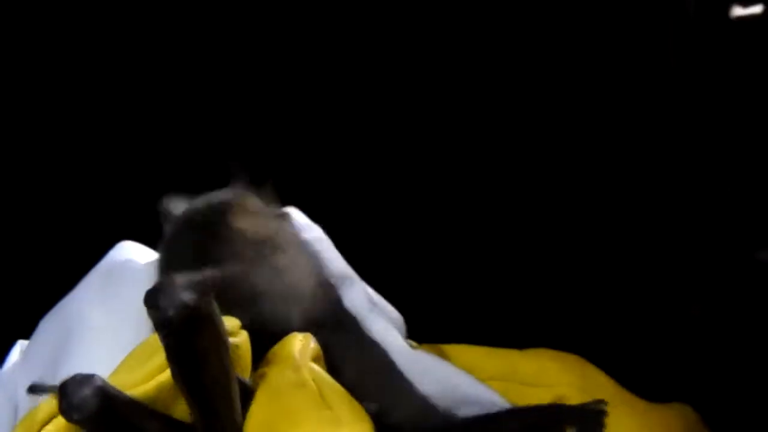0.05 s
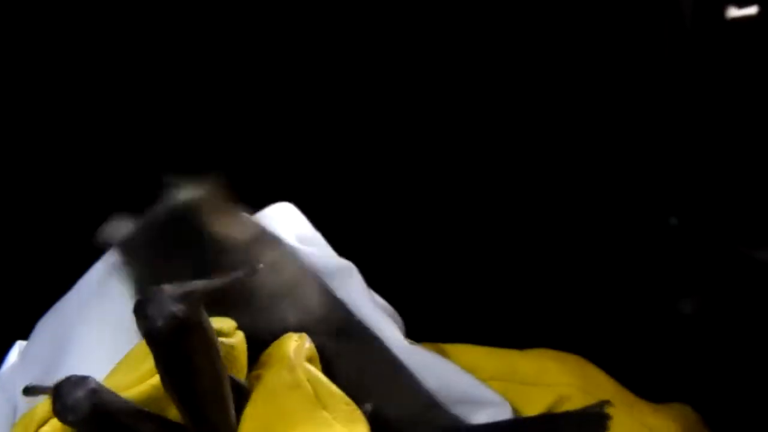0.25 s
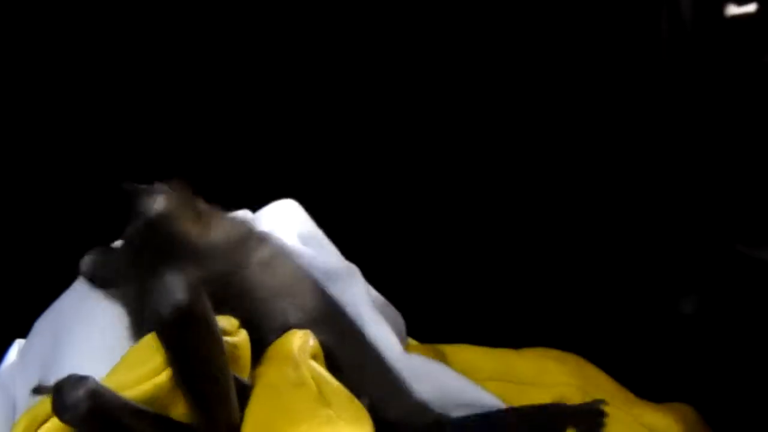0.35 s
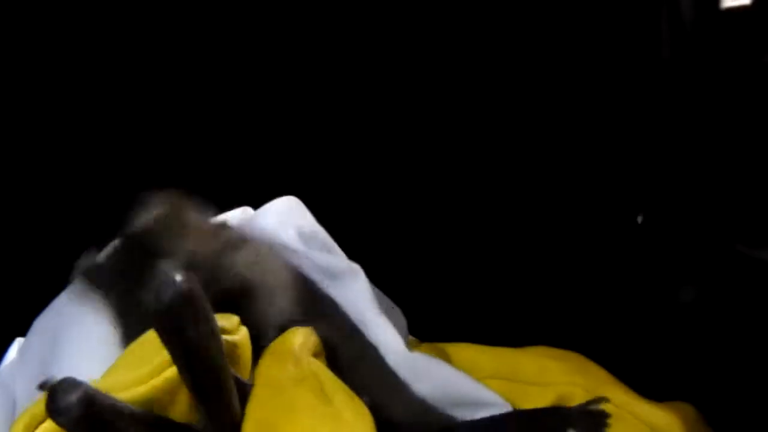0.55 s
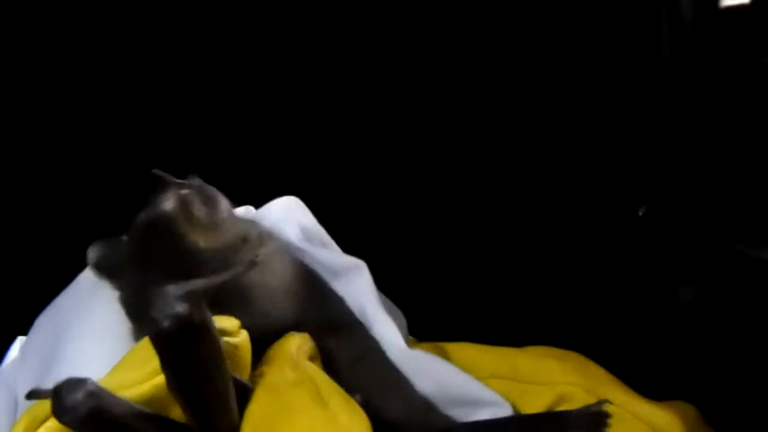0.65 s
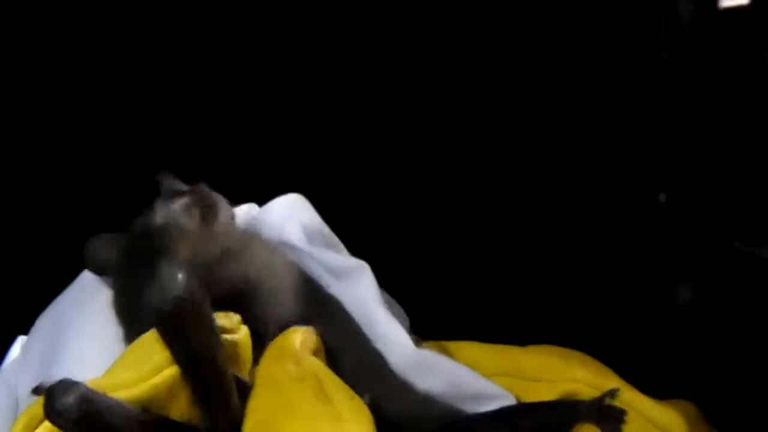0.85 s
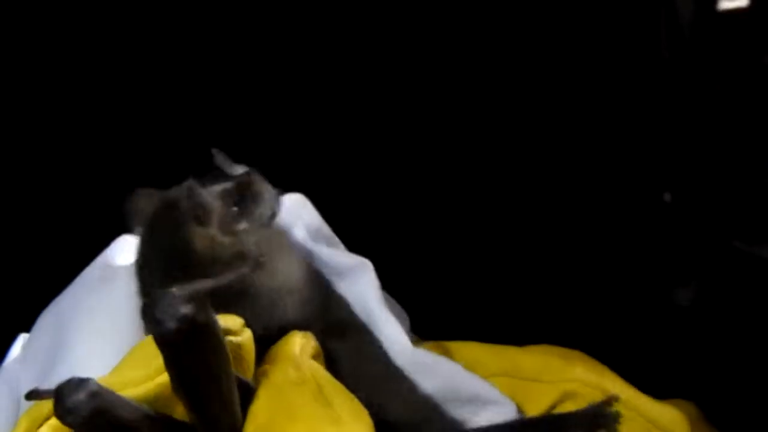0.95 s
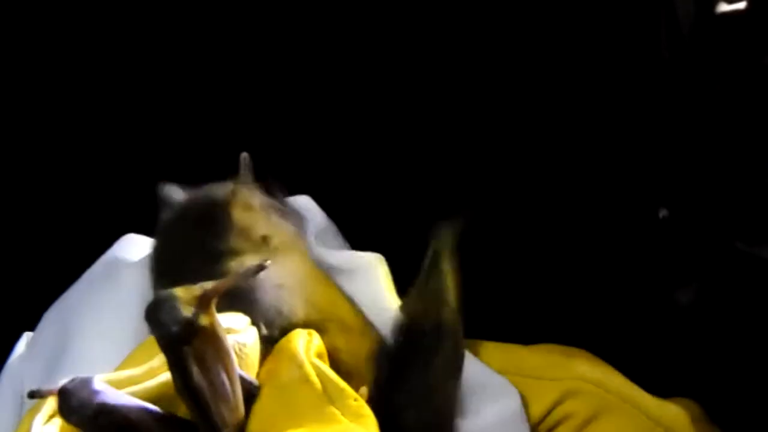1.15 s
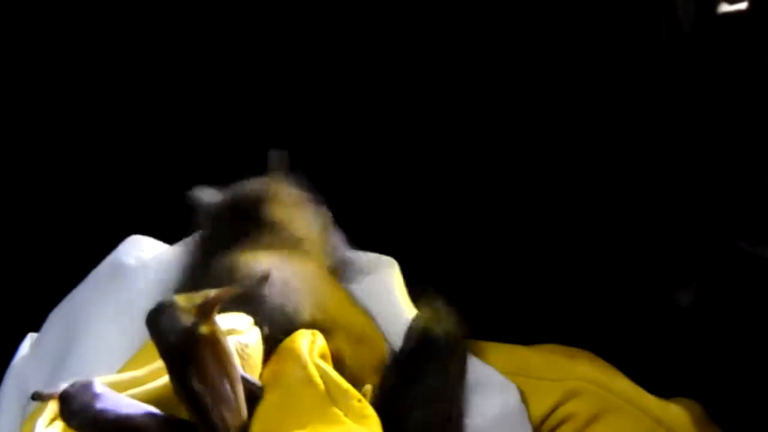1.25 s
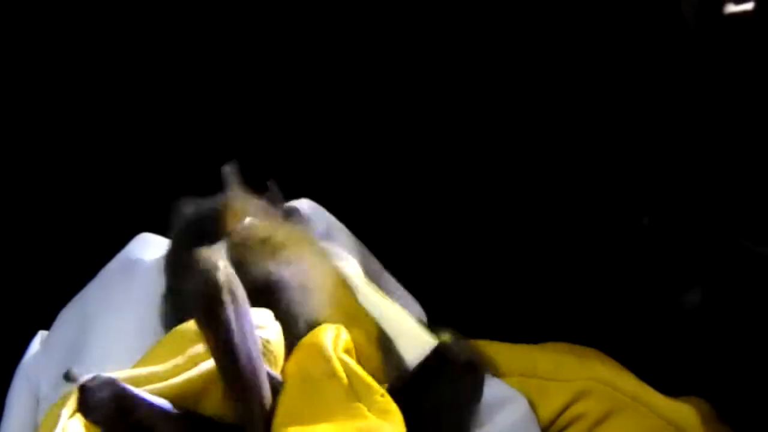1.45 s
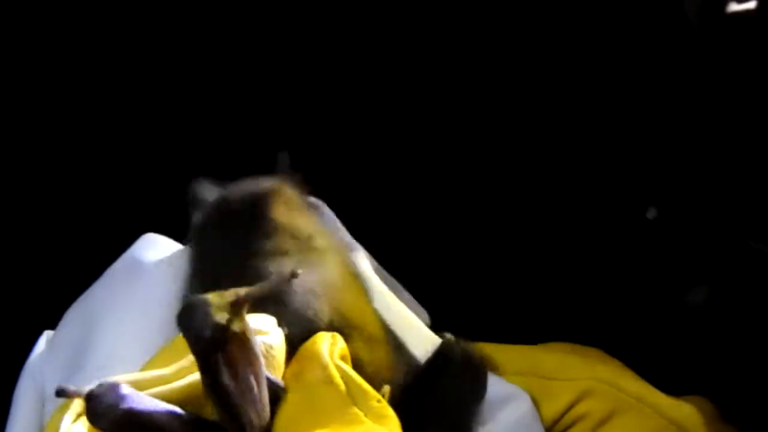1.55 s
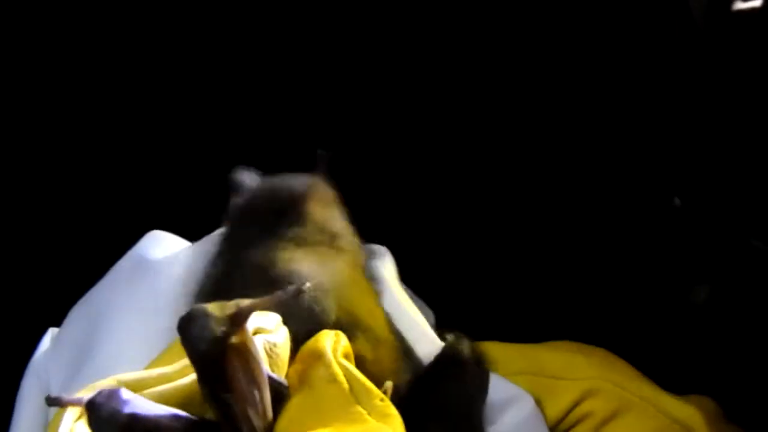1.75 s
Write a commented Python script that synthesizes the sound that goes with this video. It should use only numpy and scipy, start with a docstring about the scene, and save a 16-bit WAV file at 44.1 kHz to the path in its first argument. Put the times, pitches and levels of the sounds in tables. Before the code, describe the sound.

A bat held in a gloved hand squeaks close to the microphone, about seven short, high calls a second without a break. A faint echo, quiet hiss and low hum lie behind it, outdoors at night.

```python
"""Squeaks of a hand-held bat

A bat held in a gloved hand outdoors at night squeaks about seven times a second. As in the source-filter
model, each squeak is a harmonic series shaped by the throat. Its pitch dips, climbs to a crest and drops
as the voice closes; the overtones swell with effort and sweep through a mouth resonance.
A faint diffuse echo, a quiet night hiss and a low hum lie behind."""
import sys
import numpy as np
from scipy import signal
from scipy.fft import rfft, irfft
from scipy.io import wavfile
from scipy.ndimage import uniform_filter1d, minimum_filter1d

SR = 44100
rng = np.random.default_rng(int(sys.argv[2]) if len(sys.argv) > 2 else 0)


def master_out(mix):
    """Clip the mix to full scale and print it as 16-bit PCM to the path in sys.argv[1]."""
    frames = np.transpose(np.atleast_2d(mix))
    ceiling = np.clip(frames, -1, 1)
    pcm = np.round(ceiling * 32767).astype(np.int16)
    wavfile.write(sys.argv[1], SR, pcm)


N = 79380
T = np.arange(N) / SR

# Spectral density of the night background: f/Hz, relative level/dB
NIGHT_SPECTRUM = [(25, 2), (900, -9.5), (3400, -4), (10000, -9), (14500, -18.5)]
# Slow course of the night background: t/s, level/dB
NIGHT_ENVELOPE = [(.1, -50), (.7, -54), (1.5, -49.5)]
# Frequency response of the scattering surroundings: f/Hz, gain/dB
ECHO_RESPONSE = [(1500, -25), (6800, -24.5), (9000, -18)]
# Frequency response of the throat: f/Hz, gain/dB
THROAT_RESPONSE = [(1150, -8.5), (1400, -3), (1850, 3), (2350, -3), (3080, 3), (3600, 1), (3900, -15.5),
                   (5300, -7.5), (6100, -9.5), (7150, 2), (7750, -2.5), (11000, -19), (14500, -33)]
# Spells in which the voice breaks into strong and weak cycles: centre t/s, half length/s, depth (0-1)
PERIOD_DOUBLINGS = [(0.32, 0.013, 0.2), (0.377, 0.015, 0.01), (1.12, 0.014, 0.27), (1.645, 0.01, 0.03),
                    (1, 0.005, 0.16)]
# One squeak a row; later times count from its start, and levels are relative:
# start t/s, length/s, first turn t/s, second turn t/s, crest t/s,
# onset f/Hz, first turn f/Hz, second turn f/Hz, crest f/Hz, onset level/dB, crest level/dB,
# resting overtone level/dB, swollen overtone level/dB, swell centre t/s, swell half width/s,
# second harmonic gain/dB, mouth resonance f/Hz, mouth resonance gain/dB, antiresonance f/Hz
SQUEAK_GESTURES = [(-0.02, 0.034, 0.0055, 0.019, 0.022, 1236, 1252, 1247, 1347, -37, -33, -3, -1, 0.04, 0.016, 5.5, 7800, 8, 2806),
                   (0.0506, 0.087, 0.013, 0.043, 0.07, 1481, 1671, 1244, 1455, -31.5, -31.5, -4, 1, 0.072, 0.0091, 6, 7500, 4, 2917),
                   (0.1782, 0.091, 0.017, 0.061, 0.072, 1594, 1133, 1448, 1555, -34, -29.5, -15, 13.5, 0.066, 0.042, -0.5, 8770, 14.5, 2903),
                   (0.315, 0.086, 0.012, 0.027, 0.071, 1547, 1179, 1174, 1771, -37, -26.5, -11.5, 12, 0.063, 0.032, 1.5, 6860, 13.5, 2710),
                   (0.4454, 0.094, 0.0096, 0.038, 0.073, 1568, 1166, 1178, 1562, -39, -34.5, -18, 9, 0.074, 0.026, 1.5, 6240, 12, 2744),
                   (0.586, 0.089, 0.011, 0.049, 0.073, 1548, 1244, 1459, 1441, -37, -32.5, -15.5, -4, 0.041, 0.017, 7, 6200, 18.5, 2677),
                   (0.73, 0.084, 0.026, 0.037, 0.064, 1438, 1368, 1197, 1538, -42.5, -34, -35, 6.5, 0.063, 0.041, 4, 8430, 6, 2720),
                   (0.867, 0.086, 0.01, 0.059, 0.069, 1580, 1237, 1726, 1761, -35.5, -28, -6, 4, 0.077, 0.0084, 0, 5120, 8.5, 2840),
                   (1.0015, 0.092, 0.013, 0.035, 0.073, 1597, 1139, 1158, 1523, -37, -32, -9, 11.5, 0.069, 0.026, 2, 6680, 7, 2726),
                   (1.154, 0.069, 0.015, 0.032, 0.057, 1442, 1411, 1224, 1535, -38.5, -30, -17.5, -8, 0.06, 0.025, 6.5, 5540, 16, 2845),
                   (1.268, 0.066, 0.0166, 0.031, 0.052, 1386, 1393, 1345, 1570, -31.5, -31, -19.5, 5, 0.05, 0.025, 2, 7320, 9.5, 2880),
                   (1.367, 0.075, 0.0085, 0.053, 0.062, 1517, 1273, 1546, 1537, -35, -30.5, -18, 3.5, 0.053, 0.042, 6, 7930, 13.5, 2976),
                   (1.4745, 0.078, 0.0042, 0.021, 0.046, 1516, 1405, 1785, 1902, -33, -26, -7.5, 1.5, 0.019, 0.013, 2.5, 5620, 13, 2770),
                   (1.5996, 0.062, 0.012, 0.03, 0.047, 1480, 1415, 1187, 1402, -36.5, -29.5, -20.5, 2.5, 0.041, 0.026, -2, 9860, 10.5, 3140),
                   (1.714, 0.072, 0.0068, 0.029, 0.055, 1424, 1322, 1235, 1507, -38, -28, -13.5, -1.5, 0.05, 0.032, 0.5, 8520, 13.5, 2912)]

ECHO_T60_S, ECHO_BUILD_S = 0.14, 0.019
HUM_HZ, HUM_BANDWIDTH_HZ, HUM_DB = (415, 612), 55, -68.5
VOICE_DB, OVERTONE_DB = 1.37, -3  # offsets to the tabulated levels
ATTACK_S, RELEASE_S = 0.0006, 0.0045
CLOSING_HZ, CLOSING_CURVE = 991, 3.44  # final pitch; a higher power delays the drop
JITTER, JITTER_HZ = 0.0061, 150  # unsteadiness as a share of the pitch, and its rate
CLOSING_JITTER, CLOSING_S = 0.05, 0.0047  # the voice turns rough as it closes
FLICKER_DB, FLICKER_HZ = 1.3, 70  # each overtone wavers in level
RASP_DB, RASP_HZ = -26, 680  # cycle-to-cycle unevenness
MOUTH_HALF_WIDTH_HZ, NOTCH_HALF_WIDTH_HZ, NOTCH_DB = 554, 51, -19
SECOND_SHARE = 0.44  # share of the effort level that the second harmonic takes
OPENING_DB_PER_HZ = 0.05
TURBULENCE_DB, SNAP_DB = -23, -5  # relative to the effort level
SNAP_HALF_S, SNAP_LEAD_S = 0.0012, 0.0042  # a noise burst just before the voice shuts


def from_db(db):
    """Amplitude ratio of a level in decibels."""
    return 10 ** (np.asarray(db) / 20)


def unit_rms(x):
    """Normalisation to a root-mean-square value of 1."""
    return x / np.sqrt(np.mean(x ** 2) + 1e-20)


def level_at(spectrum, hz):
    """Level in dB, interpolated on a logarithmic frequency axis."""
    f, db = np.transpose(spectrum)
    return np.interp(np.log(np.maximum(hz, 1)), np.log(f), db)


def filtered(x, response):
    """Linear filtering: the spectrum is multiplied by a frequency response."""
    hz = np.fft.rfftfreq(len(x), 1 / SR)
    return irfft(rfft(x) * from_db(level_at(response, hz)), len(x))


def drift(corner_hz, size):
    """Random fluctuation of unit variance: white noise through a two-pole low-pass."""
    pole = np.exp(-2 * np.pi * corner_hz / SR)
    slow = signal.lfilter([1], [1, -2 * pole, pole ** 2], rng.standard_normal(size + 4000))[4000:]
    return slow * np.sqrt((1 - pole ** 2) ** 3 / (1 + pole ** 2))


def glide(t, times, values):
    """Eased interpolation: the motion slows near each target value."""
    steps = np.arange(len(times))
    place = np.interp(t, np.maximum.accumulate(times), steps)
    fraction = place % 1
    eased = (fraction + fraction ** 2 * (3 - 2 * fraction)) / 2
    return np.interp(place - fraction + eased, steps, values)


def night():
    """Ambient noise: a continuous spectrum heard as faint, nearly steady rumble and hiss."""
    noise = unit_rms(filtered(rng.standard_normal(N), NIGHT_SPECTRUM))
    return noise * from_db(np.interp(T, *np.transpose(NIGHT_ENVELOPE)))


def hum():
    """Narrow-band noise has a fluctuating envelope: two low bands waver far behind."""
    resonances = [signal.iirpeak(hz, hz / HUM_BANDWIDTH_HZ, fs=SR) for hz in HUM_HZ]
    bands = [unit_rms(signal.lfilter(b, a, rng.standard_normal(N))) for b, a in resonances]
    return from_db(HUM_DB) * sum(bands)


def echo(direct):
    """Diffuse scattering: convolution with a noise tail that builds quickly and decays exponentially."""
    t = T[:SR // 2]
    envelope = from_db(-60 * t / ECHO_T60_S) * (1 - np.exp(-t / ECHO_BUILD_S))
    tail = rng.standard_normal(len(t)) * envelope
    impulse_response = filtered(tail / np.linalg.norm(tail), ECHO_RESPONSE)[:SR // 3]
    return signal.fftconvolve(direct, impulse_response)[:N]


def turbulence(size):
    """Turbulent air is a broadband source, here filtered by the throat and stripped of bass; rms 1."""
    throat_noise = filtered(rng.standard_normal(size + 1), THROAT_RESPONSE)
    low_cut = signal.butter(2, CLOSING_HZ, "high", fs=SR, output="sos")
    return unit_rms(signal.sosfilt(np.vstack([low_cut, low_cut]), np.diff(throat_noise)))


def resonance_db(hz, centre_hz, half_width_hz, gain_db):
    """A resonance as a Lorentzian peak in level; a negative gain gives an antiresonance."""
    return gain_db / (1 + ((hz - centre_hz) / half_width_hz) ** 2)


def fundamental(t, times, pitches, length):
    """Frequency modulation: the pitch glides to its crest, then drops and roughens as the voice closes."""
    crest = times[-1]
    hz = glide(t, times, pitches)
    drop = np.clip((t - crest) / max(length - crest, 1e-3), 0, 1) ** CLOSING_CURVE
    hz = hz + (CLOSING_HZ - hz) * drop
    closing = np.exp(np.minimum(t - length, 0) / CLOSING_S)
    jitter = JITTER * drift(JITTER_HZ, len(t))
    roughness = CLOSING_JITTER * closing * drift(RASP_HZ, len(t))
    return hz * (1 + jitter + roughness)


def squeak(gesture, size=5200, harmonics=12):
    """Source and filter: the harmonics of the voice are weighted by effort, throat and mouth."""
    start, length, turn1, turn2, crest, *pitches = gesture[:9]
    onset_db, crest_db, rest_db, swell_db, swell_s, swell_width = gesture[9:15]
    second_db, mouth_hz, mouth_db, notch_hz = gesture[15:]
    t = np.arange(size) / SR
    hz = fundamental(t, [0, turn1, turn2, crest], pitches, length)
    phase = 2 * np.pi * np.cumsum(hz) / SR
    swell = np.exp(-((t - swell_s) / swell_width) ** 2)
    effort_db = OVERTONE_DB + rest_db + (swell_db - rest_db) * swell
    # the upper overtones stay weak until the opening fall of the pitch has settled
    opening_db = -OPENING_DB_PER_HZ * np.maximum(hz - pitches[1], 0) * (t < turn1)
    release = np.clip((length - t) / RELEASE_S, 0, 1)
    overtone_gate = release ** 2.5  # overtones fade faster than the fundamental
    doubling = sum(depth * np.exp(-((start + t - centre) / half) ** 4)
                   for centre, half, depth in PERIOD_DOUBLINGS)
    voice = from_db(level_at(THROAT_RESPONSE, hz)) * release * np.sin(phase)
    for k in range(2, harmonics + 1):
        overtone_hz = k * hz
        effort_share = np.interp(k, [2, 4], [SECOND_SHARE, 1])
        db = level_at(THROAT_RESPONSE, overtone_hz) + effort_share * effort_db
        db += second_db if k == 2 else opening_db
        db += resonance_db(overtone_hz, mouth_hz, MOUTH_HALF_WIDTH_HZ, mouth_db)
        db += resonance_db(overtone_hz, notch_hz, NOTCH_HALF_WIDTH_HZ, NOTCH_DB)
        db += FLICKER_DB * drift(FLICKER_HZ, size)
        # period doubling adds partials midway between the harmonics
        wave = np.sin(k * phase) + doubling * np.sin((k + 0.5) * phase)
        voice += from_db(db) * overtone_gate * wave * (overtone_hz < SR / 2)
    snap = from_db(SNAP_DB) * np.exp(-((t - length + SNAP_LEAD_S) / SNAP_HALF_S) ** 2)
    breath = turbulence(size) * from_db(effort_db) * (from_db(TURBULENCE_DB) * overtone_gate + snap)
    attack = np.clip(t / ATTACK_S, 0, 1)
    envelope = attack * from_db(VOICE_DB + glide(t, [0, crest], [onset_db, crest_db]))
    rasp = 1 + from_db(RASP_DB) * drift(RASP_HZ, size)
    return (voice + breath) * envelope * rasp


def bat():
    """Direct sound of the nearby bat: a train of squeaks, each at its own start time."""
    train = np.zeros(N + 2 * SR)  # a second of margin at each end
    for gesture in SQUEAK_GESTURES:
        call = squeak(gesture)
        onset = int((gesture[0] + 1) * SR)
        train[onset:onset + len(call)] += call
    return train[SR:SR + N]


def scene():
    """Superposition: the direct sound, its echo and the night background add in one channel."""
    direct = bat()
    return (direct + echo(direct) + night() + hum())[None]


def record(dry, ceiling=0.89, limiter_s=0.002, cutoff_hz=14250):
    """Peak and band limiting: a fast gain dip holds peaks under full scale; a steep low-pass follows."""
    window = int(limiter_s * SR)
    allowed_gain = ceiling / np.maximum(np.abs(dry), ceiling)
    gain = uniform_filter1d(minimum_filter1d(allowed_gain, window), window)
    low_pass = signal.ellip(12, 0.1, 90, cutoff_hz, fs=SR, output="sos")
    return signal.sosfilt(low_pass, dry * gain)


dry = scene()
out = record(dry)
master_out(out)
```